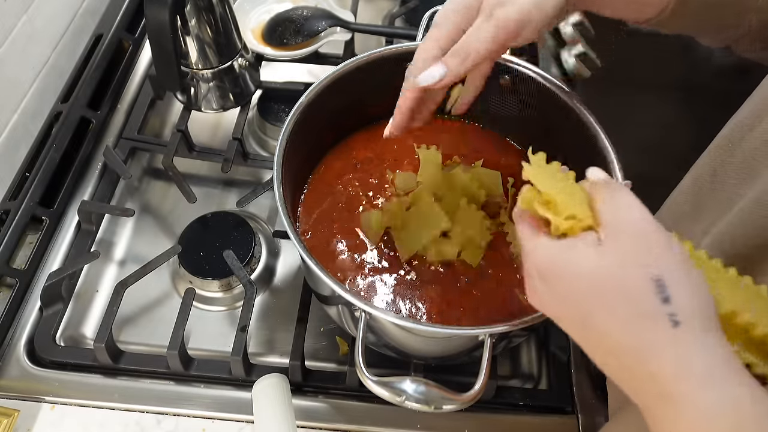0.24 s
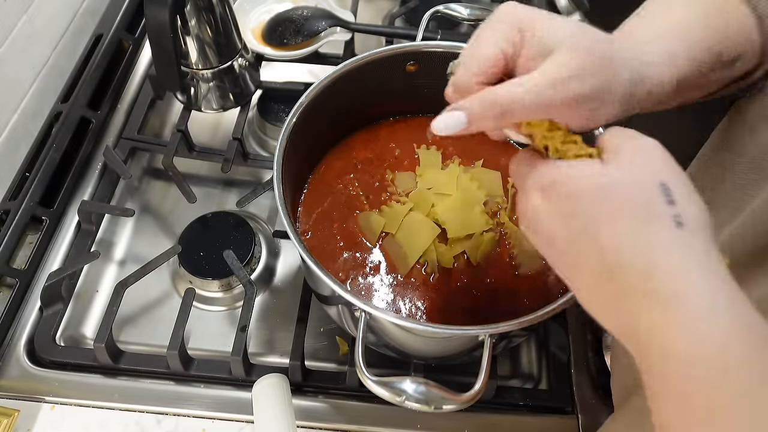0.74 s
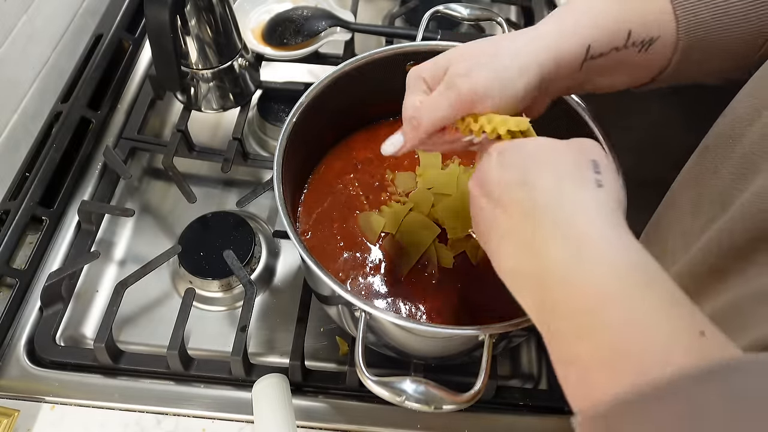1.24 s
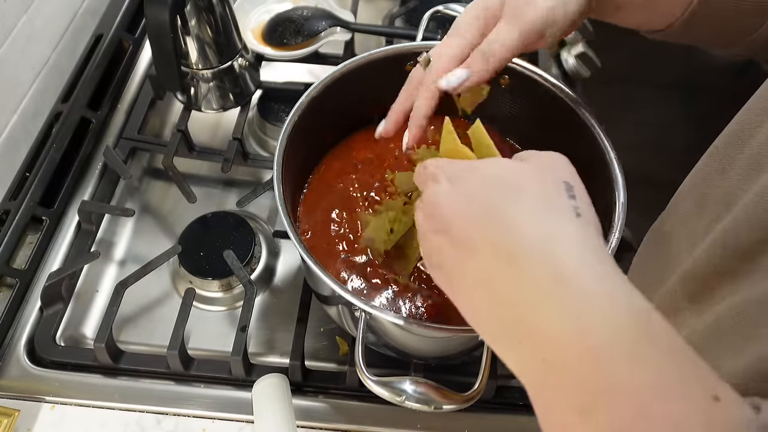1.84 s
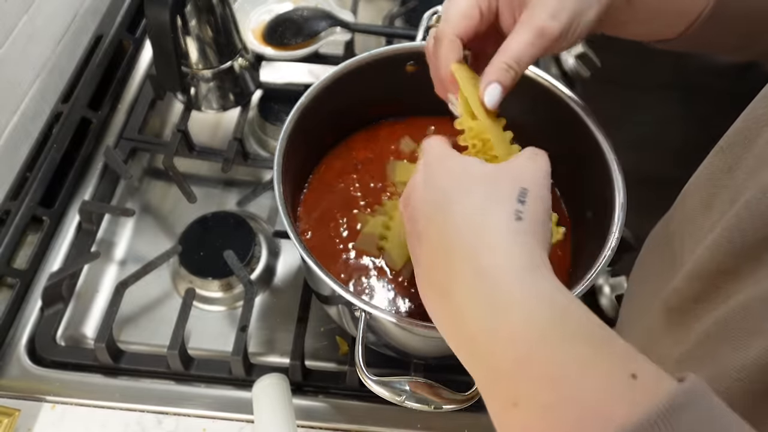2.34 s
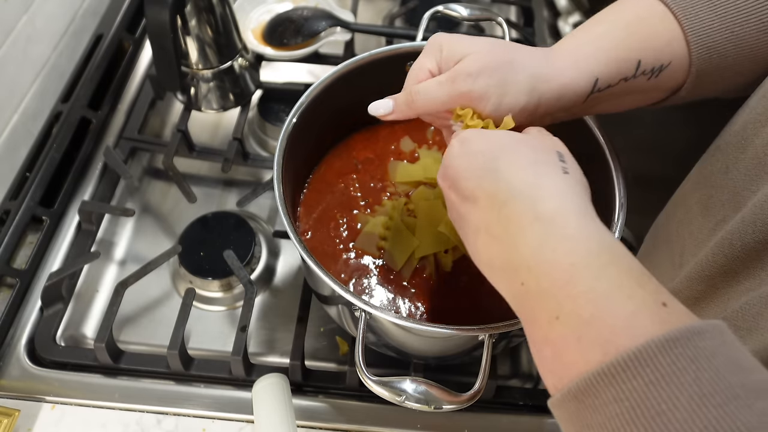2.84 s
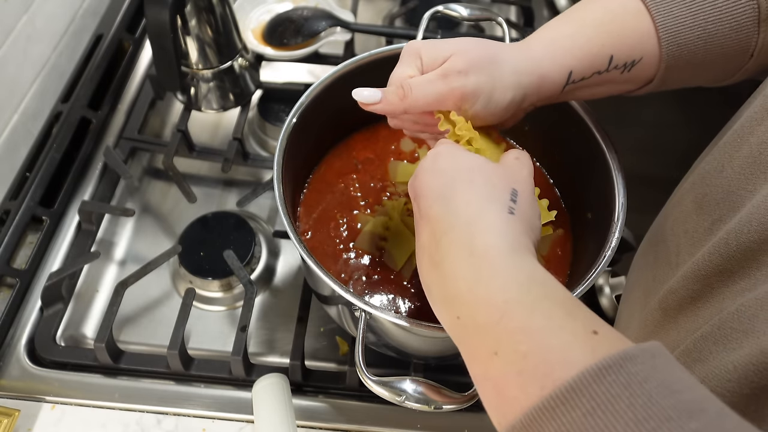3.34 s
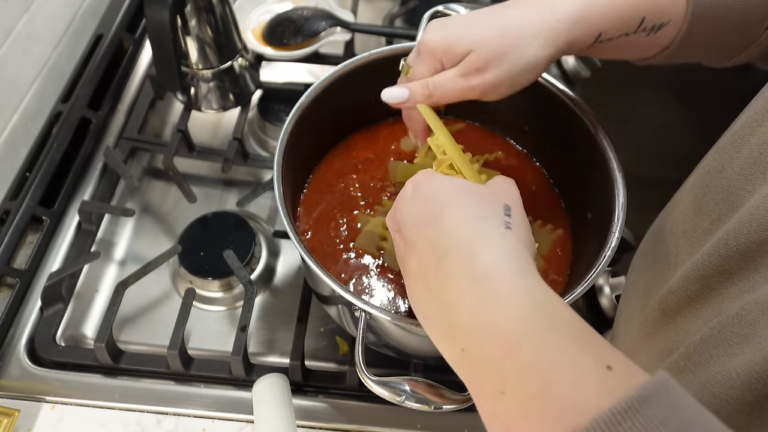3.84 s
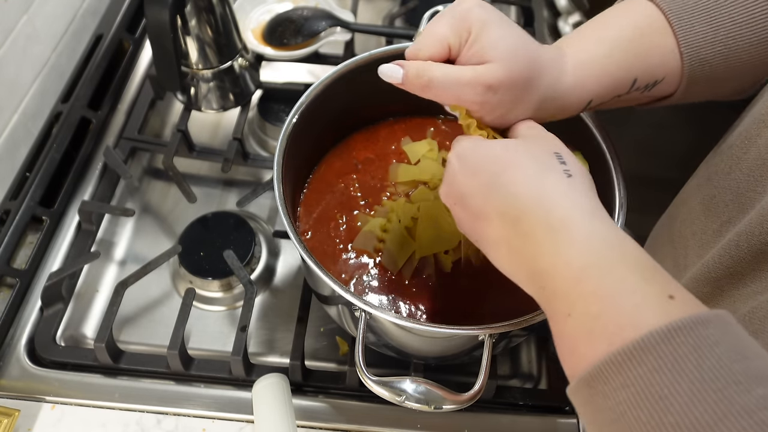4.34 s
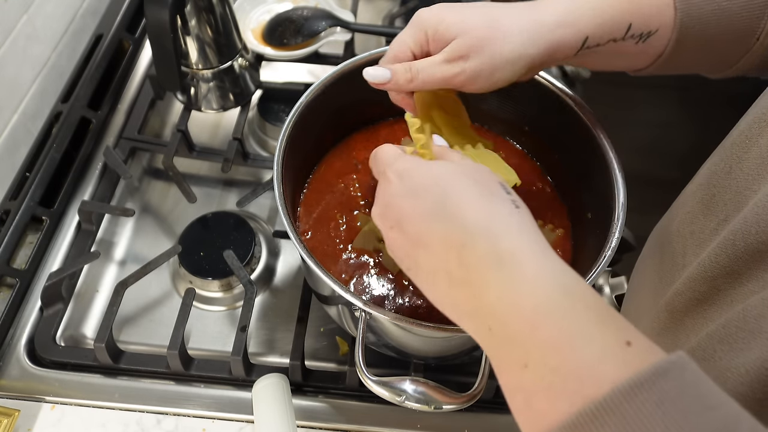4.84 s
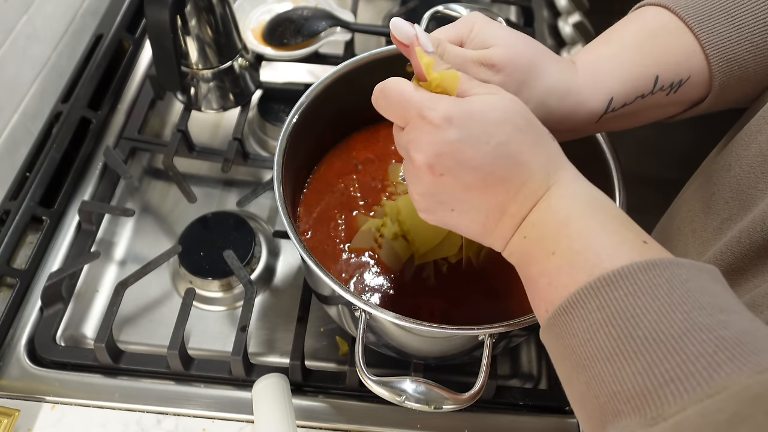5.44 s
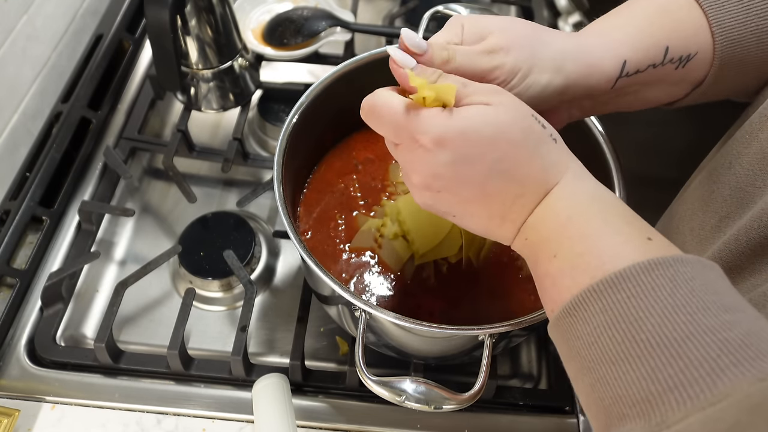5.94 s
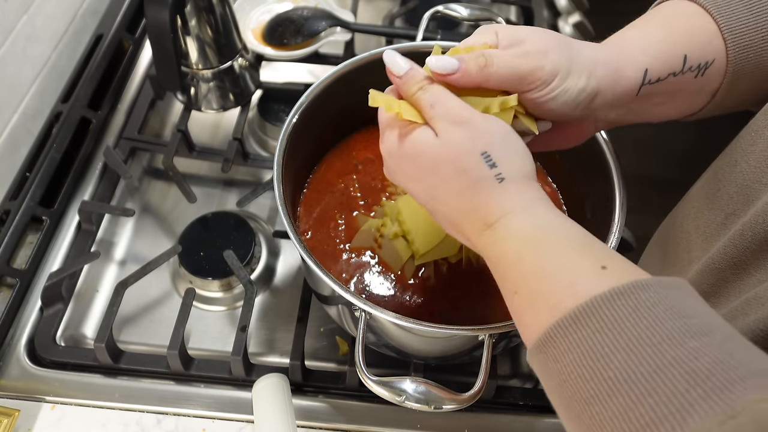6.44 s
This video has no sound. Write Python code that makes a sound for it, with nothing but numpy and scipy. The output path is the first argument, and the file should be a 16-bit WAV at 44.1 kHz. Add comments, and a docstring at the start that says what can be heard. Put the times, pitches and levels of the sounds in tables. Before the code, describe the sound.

Dry pasta sheets snap in sharp, bright cracks with small crumbling crunches, gritty rubbing and light knocks over a steel pot in a kitchen.

```python
"""Kitchen stove: two hands break dry lasagne sheets over a steel pot of sauce.
Sheets snap, and two duller cracks knock, into limiter and room; edges chip, the stack crumbles. Each break is
a decaying noise tear plus short random modes and room echoes. Between them, pieces grind (slip noise) and
tick in the fist, contacts knock at their own pitch (filtered bursts) and shards ring the pot (sine modes).
Below lie a rumble that swells in the crunches, a wavering hum and kitchen air."""
import sys
import numpy as np
from scipy import signal
from scipy.fft import rfft, irfft, next_fast_len
from scipy.io import wavfile
from scipy.ndimage import uniform_filter1d, minimum_filter1d, map_coordinates

SR = 44100
rng = np.random.default_rng(int(sys.argv[2]) if len(sys.argv) > 2 else 0)


def log_audio(samples):
    """Write samples as a 16-bit WAV file to the path given in sys.argv[1]."""
    # one column per channel
    frames = np.atleast_2d(samples).T
    # limit to full scale, then quantise
    limited = np.clip(frames, -1, 1)
    pcm = np.round(limited * 32767).astype(np.int16)
    wavfile.write(sys.argv[1], SR, pcm)


N = 295508

# Sheet snaps and two duller knocking cracks (near 1.08 and 1.18 s), each with its own resonance:
# [t/s, level before limiter/dB, brightness/(dB/oct, less 2.5 in fracture), resonance f/Hz]
SNAPS_AND_KNOCKS = [(0.8187, 5.5, 3, 1920), (1.02, -3, -1.5, 6600), (1.0777, -9, -4, 1700),
                    (1.1773, -13, -4.5, 1750), (2.4744, -5, -2, 3300), (2.719, -3, 2, 6800),
                    (2.7603, 0, -0.5, 2510), (2.839, -9, 1, 3560), (2.8557, 3.5, -0.5, 6800),
                    (3.0063, -12.5, 0, 7560), (3.32, -7, 0.5, 5700), (3.374, -6.5, -1.5, 5640),
                    (3.408, -2, -0.5, 1670), (4.183, -10.5, 3.5, 5200), (4.288, 4, 4.5, 5030),
                    (4.362, 4.5, 0.5, 5700), (4.3772, 3, -1, 4300), (5.385, -2.5, -3.5, 2200),
                    (5.475, 5, -0.5, 2100), (5.578, -3.5, 2, 3600), (5.67, -11.5, 3, 8350),
                    (6.006, 0.5, 0.5, 2060), (6.111, 4, 1, 2040), (6.295, 9.5, 0.5, 4230)]
# Single edges chip: [t/s, level/dB, brightness/(dB/oct, less 2.5 in fracture)]
EDGE_CRACKS = [(0.185, -13.5, 0.5), (0.2144, -11, 0.5), (0.2535, -10, 3), (0.281, -12.5, 1),
               (0.298, -7, -3), (0.309, -23, -7), (0.517, -26, -8), (0.674, -21, -2), (0.7782, -24.5, -1.5),
               (0.7934, -12, -0.5), (0.807, -25, -6.5), (0.8283, -1, -4), (1.116, -12, 6),
               (1.168, -14, 0.5), (1.534, -14.5, -2), (1.721, -25, 0.5), (1.7636, -10, 2.5),
               (1.785, -10, -1.5), (1.808, -15.5, 1), (1.821, -11, -1), (1.839, -17, 6), (1.8565, -4, 4.5),
               (1.9, -12.5, -1.5), (1.918, -12.5, -2.5), (1.946, -15, 1), (2.012, -7.5, 3), (2.0347, -9, 2),
               (2.1584, -14.5, -4.5), (2.277, -32, -1.5), (2.5104, -12, -2.5), (2.568, -17, -2.5),
               (2.6157, -15, -1.5), (2.745, -12, -4), (2.82, -12.5, 3), (2.911, -5.5, 4.5),
               (3.037, -21, -4.5), (3.111, -28, -1.5), (3.259, -13.5, 1.5), (3.27, -10.5, 4),
               (3.293, -13, -4), (3.343, -12, 4.5), (3.5055, -18, -0.5), (3.5577, -21, 1.5),
               (3.627, -16.5, -2), (3.656, -20.5, -5.5), (3.768, -9, 5.5), (3.845, -12.5, 0.5),
               (3.871, -16.5, 5.5), (3.914, -14, 7), (3.96, -6, 6.5), (3.999, -12, -1), (4.007, -10, 0),
               (4.139, -17, -1), (4.273, -17.5, -3.5), (4.4338, -4, -0.5), (4.533, -16.5, -0.5),
               (4.5943, -11.5, 0), (4.604, -10.5, -0.5), (4.704, -19, 1), (4.742, -14.5, 0.5),
               (4.818, -9.5, -2), (4.87, -11.5, -0.5), (4.9621, -4.5, 0.5), (4.99, -7, 0),
               (5.136, -17, -3.5), (5.245, -13.5, -2.5), (5.432, -12, 10), (5.8938, -24.5, -1),
               (5.918, -24.5, -1), (5.958, -29.5, -3), (6.0263, -12, 6), (6.1017, -12, 0), (6.229, -7, 7),
               (6.6404, -17, 6.5)]
# Dense runs of tiny cracks: [start t/s, length/s, starting level/dB, added tilt/(dB/oct), low thud level/dB]
STACK_CRUNCHES = [(0.167, 0.038, -19, -4, -58), (0.2126, 0.14, -16.5, -2.5, -43.5),
                  (1.7607, 0.18, -20.5, -2, -43), (2.011, 0.096, -23.5, -3.5, -43.5),
                  (3.748, 0.046, -16.5, 0, -60), (3.926, 0.091, -18, 0.5, -54),
                  (4.03, 0.09, -20.5, -2.5, -48), (4.95, 0.017, -14.5, -2.5, -56),
                  (4.97, 0.094, -14.5, 1, -50), (5.163, 0.07, -26, -7.5, -47.5),
                  (6.583, 0.038, -25.5, -1, -76)]
# Pieces slide over each other: [start t/s, length/s, level/dB]
HAND_RUBS = [(0, 0.063, -32), (0.11, 0.31, -32.5), (0.46, 0.098, -36.5), (1.08, 0.16, -32.5),
             (1.33, 0.068, -30), (1.42, 0.25, -47), (1.54, 0.047, -30.5), (2.26, 0.31, -48),
             (3.69, 0.43, -29), (4.41, 0.1, -31), (4.66, 0.24, -30), (4.97, 0.26, -26.5),
             (5.32, 0.015, -35), (5.8, 0.1, -34), (6.5, 0.27, -37)]
# Pieces and knuckles knock in the pot: [t/s, level/dB, pitch f/Hz, t60/s]
POT_KNOCKS = [(.168, -20.5, 534, 0.056), (0.562, -25.5, 2170, 0.12), (0.799, -13, 1930, 0.057),
              (2.07, -36, 475, 0.12), (2.408, -36.5, 504, 0.17), (2.55, -38.5, 515, 0.48),
              (3.41, -26.5, 970, 0.36), (4.433, -21.5, 580, 0.062), (5.007, -27, 7200, 0.037),
              (5.024, -22.5, 1460, 0.1), (5.0683, -15.5, 2540, 0.046), (5.1065, -10, 2560, 0.041),
              (5.215, -15, 1550, 0.031)]
# Shards strike the pot wall: [t/s, level/dB]
SHARD_HITS = [(3.411, -36), (5.16, -27)]
# Pot modes: [f/Hz, level re hit/dB, t60/s]
POT_MODES = [(930, -24, 1.9), (1470, -8, 0.61), (1825, -14, 0.55), (2403, -7, 0.64), (2937, -4.5, 0.28),
             (3555, 3.5, 0.26), (4030, 1, 0.19), (4690, 7.5, 0.1)]
# Low hum swells: [start t/s, length/s, level/dB]
HUM_SWELLS = [(1.78, 0.52, -50.5), (4.85, 0.53, -58)]
# Relative spectra of breaks, sliding, rumble, air and room tail: [f/Hz, level/dB]
SHEET_SPECTRUM = [(90, -30.5), (300, -29), (550, -18), (1200, -18), (1800, -8), (3000, -3), (5000, 3),
                  (7200, 5), (9500, -3.5), (12500, -9.5), (16000, -11.5)]
SCRAPE_SPECTRUM = [(150, -24.5), (500, -6), (1450, -3), (1830, 0), (2150, 0.5), (3500, 5.5), (5200, 3.5),
                   (7000, 5.5), (10000, -6.5), (14000, -21.5)]
THUD_SPECTRUM = [(20, -42), (110, -2.5), (155, 4), (220, -12.5), (500, -9.5), (1200, -25)]
AIR_SPECTRUM = [(20, 2), (110, -9.5), (550, 8), (800, -4.5), (2200, 0.5), (6000, -1), (16000, -24)]
ROOM_SPECTRUM = [(200, -8), (1400, 0), (2100, 2.5), (2800, -1.5), (3700, -0.5), (8000, -2.5), (15000, 4)]
# Room decay: [f/Hz, t60/s]
ROOM_T60 = [(200, 0.36), (2000, 0.45), (8000, 0.33), (15000, 0.13)]

TOP_HZ = 16000
CRUMB_S, CRUMB_DB = 0.15, -19  # crumbs after a snap or knock: time span, first level re that break
CRUNCH_GAP_S, CRUNCH_FADE_DB, CRUNCH_SCATTER_DB = 0.0065, 7.5, 4.5  # mean gap, loss over run, size std
ATTACK_S, RELEASE_DB_PER_S = 0.012, 232  # swell of rubs, thuds and hum
TICK_GAP_S, TICK_DB, TICK_SCATTER_DB = 0.018, 5, 9  # slot, offset re rub gain, size scale
RUMBLE_REST_DB, HUM_REST_DB = -57, -65.5  # between swells, before the rumble's wobble


def snaps(body_db=5, body_octaves=0.17, count=9):
    """Sheets snap, and two duller cracks knock, each with its own resonance and echoes; crumbs follow."""
    track = np.zeros(N)
    crumbs = shards(tilt=2.5, tilt_spread=3.1, count=count)
    for s, db, tilt, body_hz in SNAPS_AND_KNOCKS:
        body = lambda hz: body_db / (1 + (np.log2((hz + 1) / body_hz) / body_octaves) ** 2)
        echo = echoes(wall_db=-6.0, room_db=-6.5)
        snap = fracture(tilt, tear_t60=0.013, ring_t60=0.013, ring_db=-5.5, echo=echo, body=body)
        add(track, s, amp(db) * snap)
        for crumb, late in zip(crumbs, rng.random(count)):
            add(track, s + CRUMB_S * late, amp(db + CRUMB_DB - 20 * late) * crumb)
    return track


def fracture(tilt, tear_t60, ring_t60, ring_db, echo, count=16, body=lambda hz: 0):
    """A crack tears through as fast-decaying noise; the freed piece rings briefly in random modes."""
    t = np.arange(SR // 12) / SR
    tear = rng.standard_normal(len(t)) * amp(-60 * t / tear_t60)
    mode_hz = 1600 * 5.1 ** rng.random((count, 1))
    mode_t60 = ring_t60 * (.5 + rng.random((count, 1)))
    modes = np.sin(2 * np.pi * mode_hz * t) * amp(-60 * t / mode_t60)
    ring = np.sum(rng.standard_normal((count, 1)) * modes, axis=0)
    direct = unit(tear) + amp(ring_db) * unit(ring)
    # echoes gather sound radiated all round: they share only the broad colour
    burst = echo + np.pad(direct / np.linalg.norm(direct), (0, len(echo) - len(t)))
    # no two pieces are alike
    humps = np.column_stack([np.geomspace(1000, TOP_HZ, num=40), 2 * rng.standard_normal(40)])

    def colour(hz):
        slope_db = (tilt - 2.5) * np.log2(np.clip(hz, 1600, 9000) / 4000)
        return along(SHEET_SPECTRUM, hz) + along(humps, hz) + body(hz) + slope_db

    power = np.mean(amp(colour(np.linspace(0, SR / 2, num=200))) ** 2)
    return coloured(burst, colour) * np.sqrt(SR // 250 / power)  # level referred to 4 ms


def shards(tilt, tilt_spread, count):
    """Tiny dry breaks inside the fist, some duller and some brighter."""
    sounds = []
    for _ in range(count):
        shard_tilt = tilt + tilt_spread * rng.standard_normal()
        echo = echoes(wall_db=-5.0, room_db=-17.5)
        sounds.append(fracture(shard_tilt, tear_t60=0.012, ring_t60=0.03, ring_db=-1.5, echo=echo, count=7))
    return sounds


def cracks():
    """Single edges chip off."""
    track = np.zeros(N)
    for s, db, tilt in EDGE_CRACKS:
        add(track, s, amp(db) * chip(tilt))
    return track


def chip(tilt):
    """A small break with few modes, half shielded by the hands: less room echo than a snap."""
    echo = echoes(wall_db=-7.0, room_db=-11)
    return fracture(tilt, tear_t60=0.014, ring_t60=0.048, ring_db=-7.0, echo=echo, count=9)


def crunches(jitter=0.45, count=36):
    """One crack follows another at uneven intervals, weaker on average as the strain is spent."""
    track = np.zeros(N)
    sounds = shards(tilt=2.86, tilt_spread=2.37, count=23)
    for row, (start, length, db, tilt, _) in enumerate(STACK_CRUNCHES):
        run = np.zeros(SR // 2)
        for k, (size, slip) in enumerate(rng.standard_normal((count, 2))):
            delay = CRUNCH_GAP_S * abs(k + jitter * slip * (k > 0))
            if delay < length:
                level_db = db - CRUNCH_FADE_DB * delay / length + CRUNCH_SCATTER_DB * size
                add(run, delay, amp(level_db) * sounds[(row * count + k) % len(sounds)])
        add(track, start, coloured(run, lambda hz: tilt * np.log2(np.clip(hz, 1600, 9000) / 5000)))
    return track


def grinding(hiss_db=-5):
    """Rough faces slide in tiny dry slips over a fine hiss; changing contacts shift the colour."""
    slips_per_s, spread_db, slip_t60, patchy_db = 700, 5, .012, 3
    sizes = amp(spread_db * np.minimum(rng.exponential(size=N), 3))
    slips = (rng.random(N) < slips_per_s / SR) * sizes
    slip_decay = amp(-60 * np.arange(SR // 50) / SR / slip_t60)
    chatter = signal.fftconvolve(slips ** 2, slip_decay ** 2)[:N]  # slip powers add
    rub = (unit(np.sqrt(np.abs(chatter))) + amp(hiss_db)) * rng.standard_normal(N)
    z = signal.stft(rub, nperseg=256)[2]
    patches = uniform_filter1d(rng.standard_normal(z.shape), size=5, axis=0)  # over frequency
    patches = uniform_filter1d(patches, size=9, axis=1)  # over time
    rub = signal.istft(z * amp(patchy_db * unit(patches)), nperseg=256)[1][:N]
    scrape = unit(coloured(rub, lambda hz: along(SCRAPE_SPECTRUM, hz)))
    grit = scrape * swells(HAND_RUBS) * amp(0.42 * wobble(35))
    return grit + signal.fftconvolve(grit, echoes(wall_db=-37, room_db=-10.5))[:N]


def ticks(count=13):
    """Edges of sliding pieces catch and click, louder in a louder rub."""
    track, pressure = np.zeros(N), swells(HAND_RUBS)
    sounds = shards(tilt=0.57, tilt_spread=1.8, count=count)
    for k, (slip, size, pick) in enumerate(rng.random(size=(400, 3))):
        s = (k + slip) * TICK_GAP_S
        if s * SR < N:
            gain = pressure[int(s * SR)] * amp(TICK_DB + TICK_SCATTER_DB * (2 * size - 1.5))
            add(track, s, gain * sounds[int(pick * count)])
    return track


def drops(width_octaves=.22):
    """Contacts in the pot: decaying noise peaked at a pitch, from hollow pat to short clack."""
    track, t = np.zeros(N), np.arange(SR // 3) / SR
    for s, db, pitch_hz, t60 in POT_KNOCKS:
        hollow = lambda hz: -20 * np.log10(1 + (np.log2((hz + 1) / pitch_hz) / width_octaves) ** 2)
        knock = unit(coloured(rng.standard_normal(len(t)), hollow))
        add(track, s, knock * amp(db - 60 * t / t60))
    return track


def pot(waver_rad=0.58):
    """The steel wall rings in unsteady modes, damped by the sauce; the room takes it up."""
    track, t = np.zeros(N), np.arange(SR // 2) / SR
    onset = 1 - np.exp(-t / 0.00076)
    for s, db in SHARD_HITS:
        for hz, mode_db, t60 in POT_MODES:
            ring = np.sin(2 * np.pi * hz * t + waver_rad * wobble(96, count=len(t)))
            add(track, s, amp(db + mode_db - 60 * t / t60) * onset * ring)
    return track + signal.fftconvolve(track, echoes(wall_db=6.5, room_db=-13))[:N]


def background(hum_hz=56):
    """Dull rumble swells as the hands bear down in crunches; a low hum wavers over kitchen air."""
    thuds = swells([(s, length, thud_db) for s, length, _, _, thud_db in STACK_CRUNCHES])
    rumble = noise(THUD_SPECTRUM) * amp(0.5 + 0.47 * wobble(8.9)) * (amp(RUMBLE_REST_DB) + thuds)
    hum_phase = 2 * np.pi * hum_hz * np.arange(N) / SR + 0.65 * wobble(4.7)
    hum = np.sin(hum_phase) * (amp(HUM_REST_DB) + swells(HUM_SWELLS))
    return rumble + hum + amp(-48.0) * noise(AIR_SPECTRUM)


def echoes(wall_db, room_db):
    """Pot, hands and stove answer within milliseconds, then the room rings; new draw per call."""
    hz, t, z = signal.stft(rng.standard_normal(SR // 3), SR, nperseg=256)
    fade = amp(along(ROOM_SPECTRUM, hz)[:, None] - 60 * t / along(ROOM_T60, hz)[:, None])
    tail = signal.istft(z * fade, SR, nperseg=256)[1]
    t = np.arange(len(tail)) / SR
    tail = tail * (1 - np.exp(-t / 0.0024))
    # cubing makes the early reflections sparse
    walls = rng.standard_normal(len(t)) ** 3 * amp(-60 * t / 0.036) * (1 - np.exp(-t / 0.0084))
    return amp(wall_db) * walls / np.linalg.norm(walls) + amp(room_db) * tail / np.linalg.norm(tail)


def swells(rows):
    """Gain of (start s, length s, dB) strokes: each builds up, holds and dies away."""
    gain, t = np.zeros(N), np.arange(SR * 2 // 3) / SR
    for s, length, db in rows:
        release_db = RELEASE_DB_PER_S * np.maximum(t - length, 0)
        add(gain, s, np.minimum(t / ATTACK_S, 1) * amp(db - release_db))
    return gain


def amp(db):
    """Decibels to gain."""
    return 10 ** (np.asarray(db) / 20)


def unit(x):
    """Scale to rms 1."""
    return x / np.sqrt(np.mean(x ** 2) + 1e-20)


def along(points, hz):
    """(Hz, value) points read on a log-frequency axis."""
    f, v = np.transpose(points)
    return np.interp(np.log(hz + 1), np.log(f + 1), v)


def wobble(rate, count=N):
    """A smooth random curve with rate knots a second."""
    knots = rng.standard_normal(count // 20)
    return map_coordinates(knots, [np.arange(count) * rate / SR], mode="wrap")


def coloured(x, gain_db):
    """Causal minimum-phase filter, via the folded cepstrum, with gain_db a function of Hz."""
    m = 2 * next_fast_len(len(x) // 2 + SR // 20)
    cepstrum = irfft(np.log(amp(gain_db(np.fft.rfftfreq(m, 1 / SR)))))
    cepstrum[1:m // 2] *= 2
    cepstrum[m // 2 + 1:] = 0
    return irfft(rfft(x, m) * np.exp(rfft(cepstrum)))[:len(x)]


def noise(spectrum):
    """Noise of rms 1 with the given spectrum."""
    return unit(coloured(rng.standard_normal(N), lambda hz: along(spectrum, hz)))


def add(track, s, sound):
    """Mix a sound into the track at s seconds."""
    part = track[max(0, round(s * SR)):][:len(sound)]
    part += sound[:len(part)]


def scene():
    """Sum of all sources in one channel."""
    breaks = snaps() + cracks() + crunches()
    handling = grinding() + ticks() + drops() + pot()
    return (breaks + handling + background())[None]


def released(over_db, db_per_s):
    """Hold each peak of a dB curve and let it fall at a steady speed."""
    ramp = db_per_s * np.arange(N) / SR
    return np.maximum.accumulate(over_db + ramp) - ramp


def record(dry, ceiling_db=-0.13, slow_share=0.36):
    """A limiter ducks at peaks over the ceiling, recovers fast and slow; then the band limit."""
    over_db = np.maximum(20 * np.log10(np.abs(dry[0]) + 1e-9) - ceiling_db, 0)
    fast_db = released(over_db, db_per_s=1800)
    slow_db = released(over_db, db_per_s=116)
    duck_db = (1 - slow_share) * fast_db + slow_share * slow_db
    gain_db = uniform_filter1d(minimum_filter1d(-duck_db, size=31), size=45)  # looks ahead under 1 ms
    limited = np.clip(dry * amp(gain_db), -1, 1)
    m = next_fast_len(N + SR // 10)
    passband = np.fft.rfftfreq(m, 1 / SR) < TOP_HZ
    return irfft(rfft(limited, m) * passband, m)[:, :N]


dry = scene()
out = record(dry)
log_audio(out)
```